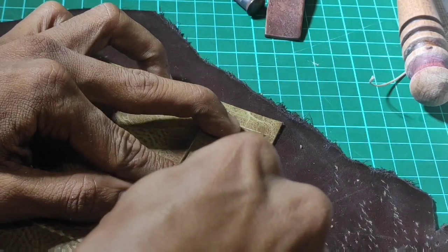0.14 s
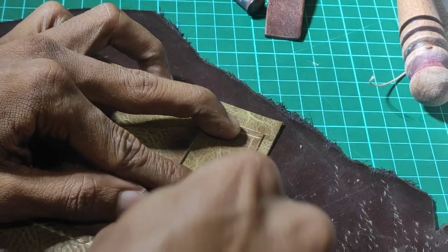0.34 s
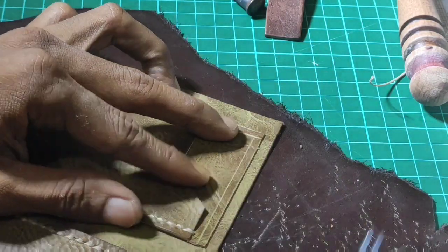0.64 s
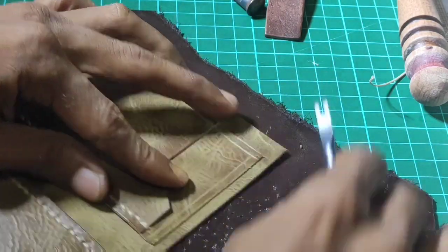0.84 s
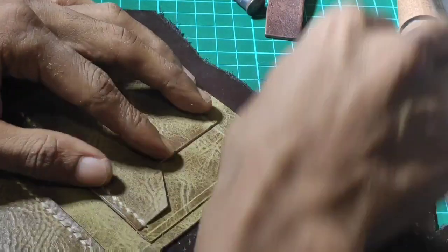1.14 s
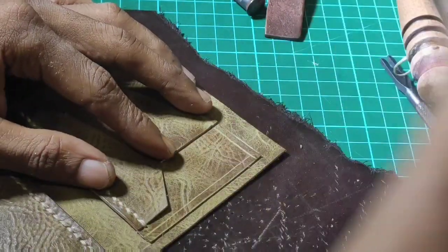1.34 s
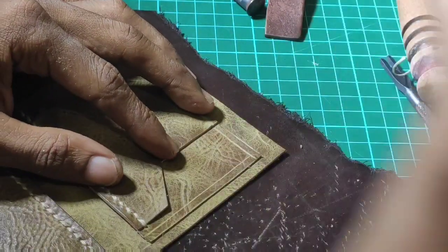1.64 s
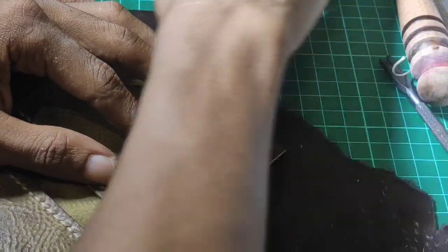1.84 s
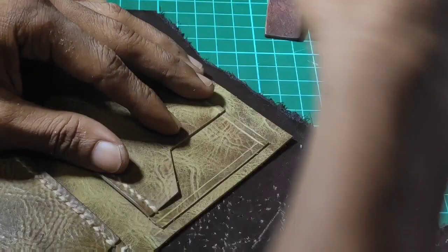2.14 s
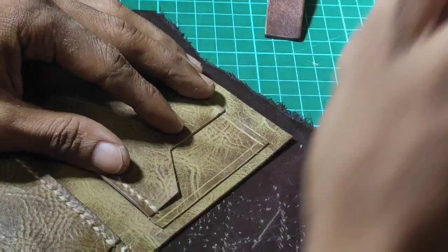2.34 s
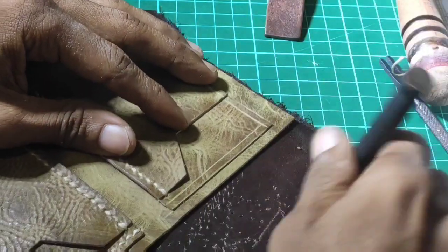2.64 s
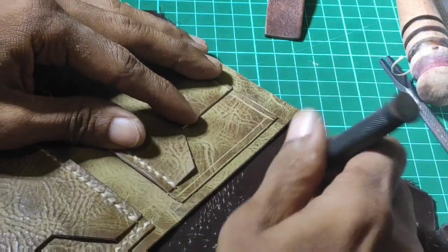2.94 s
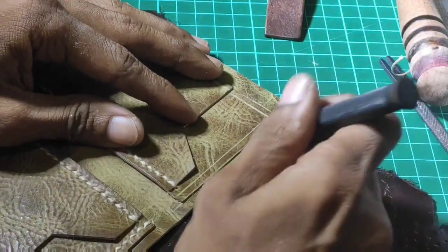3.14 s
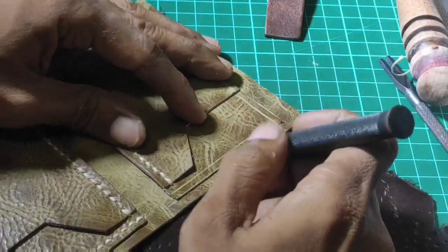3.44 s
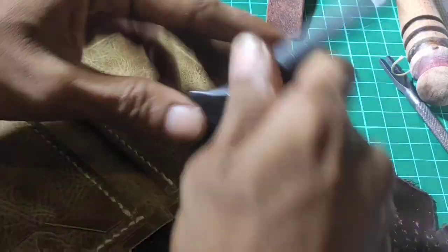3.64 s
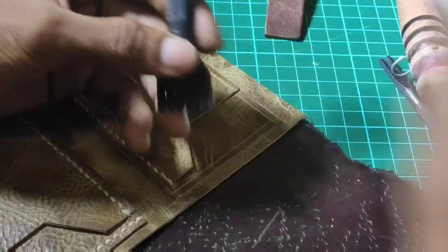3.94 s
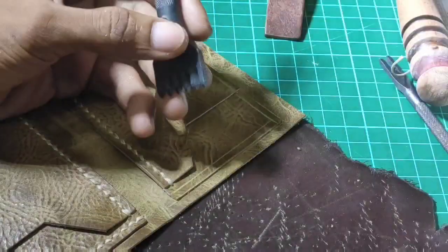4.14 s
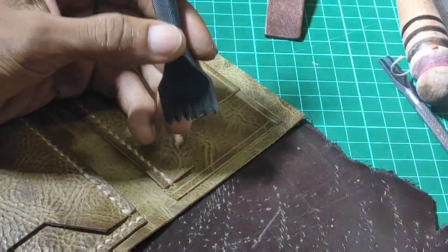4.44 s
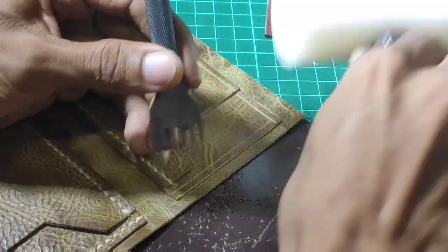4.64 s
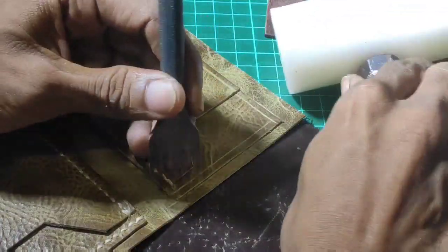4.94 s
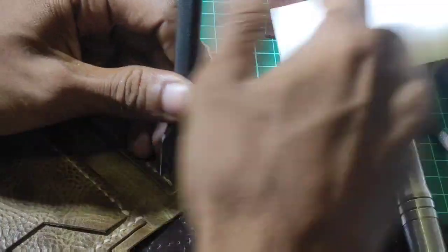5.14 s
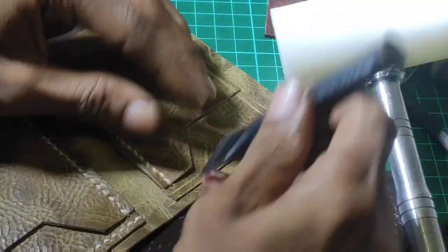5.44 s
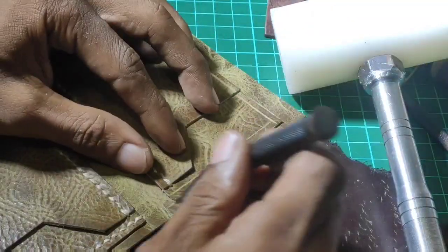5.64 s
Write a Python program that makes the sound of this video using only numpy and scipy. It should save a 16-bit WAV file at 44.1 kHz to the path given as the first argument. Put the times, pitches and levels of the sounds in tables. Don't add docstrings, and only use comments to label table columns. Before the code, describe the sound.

Steel leather tools clack onto a cutting mat on a wooden table, a short gritty drag follows, then a nylon mallet thuds down and settles.

```python
import sys
import numpy as np
from scipy import signal
from scipy.fft import rfft, irfft
from scipy.io import wavfile
from scipy.ndimage import uniform_filter1d

SR = 44100
rng = np.random.default_rng(int(sys.argv[2]) if len(sys.argv) > 2 else 0)


def master_out(mix):
    frames = np.transpose(np.atleast_2d(mix))
    ceiling = np.clip(frames, -1, 1)
    pcm = np.round(ceiling * 32767).astype(np.int16)
    wavfile.write(sys.argv[1], SR, pcm)


def decibels_to_gain(level_db):
    exponent = np.asarray(level_db, float) / 20
    return 10 ** exponent


N = 255294
TIME = np.arange(N) / SR

# f/Hz, correlation [-1 to 1]
ALIKE = [(60, 0.89), (300, 0.79), (640, 0.35), (1400, -0.38), (3000, -0.057), (15000, -0.14)]


def unit(x):
    return x / np.sqrt(np.mean(x ** 2))


def read(table, hz):
    f, v = np.transpose(table)
    return np.interp(np.log(np.maximum(hz, 1)), np.log(f), v)


def noise(colour, size=N, alike=None):
    hz = np.fft.rfftfreq(size, 1 / SR)
    share = np.clip(read(alike, hz), -.99, .99) if alike else 0 * hz
    spectra = rfft(rng.standard_normal((2, size))) * decibels_to_gain(read(colour, hz))
    mid, side = spectra * np.sqrt([1 + share, 1 - share])
    return unit(irfft([mid + side, mid - side], size))


def hump(hz, octaves):
    near, far = 2 ** (octaves / 2), 2 ** (2 * octaves)
    return [(hz / far, -40), (hz / near, -3), (hz, 0), (hz * near, -3), (hz * far, -40)]


def walk(rate):
    k = int(SR / rate)
    return uniform_filter1d(np.repeat(rng.standard_normal(N // k + 1), k), k)[:N]


def swell(s, db, rise_s, fall_s):
    return decibels_to_gain(db - 20 * np.maximum((s - TIME) / rise_s, (TIME - s) / fall_s))


def fade(t, t60):
    return 1000. ** (-t / t60)


def ring(modes, scatter_db=0., size=SR // 2):
    hz, db, t60 = np.transpose(modes)[:, :, None]
    t = np.arange(size) / SR
    gain = decibels_to_gain(db + scatter_db * rng.standard_normal(db.shape))
    return np.sum(gain * np.sin(2 * np.pi * hz * t) * fade(t, t60), axis=0)


def add(out, s, x, pan_db=0.):
    i = int(s * SR)
    x = (np.atleast_2d(x) * decibels_to_gain(np.array([[pan_db], [-pan_db]]) / 2))[:, :N - i]
    out[:, i:i + x.shape[1]] += x


def room_tone():
    # f/Hz, level/dB per Hz
    air_colour = [(35, -19), (60, 1.5), (92, -9.5), (208, -15.5), (269, -17.5), (296, -16.5), (357, -26),
                  (383, -22.5), (411, -21.5), (870, -19.5), (1490, -27), (2680, -30), (7890, -43.5),
                  (14900, -43.5), (16300, -43)]
    level_db = -62.5 + .7 * walk(2.5)
    return decibels_to_gain(level_db) * noise(air_colour, alike=ALIKE)


def fan_hum():
    # f/Hz, rms level/dB
    fan_lines = [(293, -88), (384, -82), (757, -86.5)]
    return sum(decibels_to_gain(db + 2.5 + 5.3 * walk(6.1)) * np.sin(2 * np.pi * hz * TIME) for hz, db in fan_lines)


def table_sway():
    # t/s, level/dB
    leans = [(.03, -69), (.29, -66), (.6, -67), (1.21, -62), (1.55, -60), (1.71, -66), (2.01, -58),
             (2.37, -50), (2.51, -57), (2.63, -56), (3.03, -58), (3.3, -65), (3.45, -66), (3.77, -65),
             (4.05, -62), (4.32, -59), (4.43, -58), (4.66, -63), (4.92, -48), (5.06, -53), (5.26, -63),
             (5.53, -65), (5.68, -64)]
    rest_db, lean_in_s, settle_s = -71, .16, .18
    rumble = noise([(10, -24), (25, 12), (40, 26.0), (62, 9.5), (90, -45)], alike=[(20, 1.0), (100, 0.92)])
    strongest = np.max([swell(s, db, lean_in_s, settle_s) for s, db in leans], axis=0)
    return strongest.clip(decibels_to_gain(rest_db)) * rumble


def room(x):
    # f/Hz, level/dB, t60/s (time to fade by 60 dB)
    echo_bands = [(132, -31.5, 0.42), (256, -24, 0.33), (605, -23, 0.36), (1500, -23, 0.44),
                  (4000, -14, 0.45), (9400, -8.5, 0.2)]
    t = np.arange(SR // 2) / SR
    tail = 0
    for hz, db, t60 in echo_bands:
        tail = tail + decibels_to_gain(db) * noise(hump(hz, 1.0), len(t), ALIKE) * fade(t, t60)
    first_echo = np.clip((t - .002) / 0.0015, 0, 1)
    tail = tail * first_echo * np.cos(np.pi * t) ** 2 * decibels_to_gain(-27.5)
    return signal.fftconvolve(x.mean(axis=0)[None], tail)[:, :N]


def table_shakes():
    # t/s, peak/dB, f/Hz, t60/s
    presses = [(1.1935, -39, 111, 0.098), (.742, -47, 127, 0.15), (4.9, -45, 58, 0.2), (4.31, -46, 95, .12),
               (2.982, -46, 118, 0.2), (2.319, -45.5, 47.5, 0.51), (2.2, -47, 44, 0.28),
               (4.945, -32.5, 83, 0.15)]
    rocks = [(2.0028, -30, 96, .07), (2.022, -34, 110, .06), (2.0375, -27, 112, .055),
             (2.045, -36, 175, .06), (2.071, -35, 105, .06)]
    rolls = [(4.910, -19, 105, .045), (4.983, -33, 92, .2), (5.013, -39, 80, .12), (5.034, -36, 185, .07),
             (5.046, -35, 110, .07)]
    out = np.zeros((2, N))
    soft_push = np.hanning(120) / 60
    for s, db, hz, t60 in presses + rocks + rolls:
        add(out, s, signal.fftconvolve(ring([(hz, db, t60)]), soft_push))
    return out


def drag():
    # fastest moment t/s, hiss/dB, rub minus hiss/dB, rise time per 20 dB/s, fall time per 20 dB/s (0 =
    strokes = [(0.899, -74.5, -3.5, 0.062, 0.9), (2.646, -72, 3, 0.015, 0.35),
               (3.855, -79.5, 13, 0.012, 0.22), (4.316, -64.5, -0.5, 0.032, 0.17),
               (4.36, -54, 7.5, 0.06, 0.075), (4.39, -78, 14.5, .05, 0.05), (1.3, -82, 21, 0.21, 0.43),
               (4.438, -53, 5, 0.013, 0.1327), (4.486, -50.5, -5, 0.058, 0.0455),
               (4.55, -72.5, -17, 0.04, 0.2), (4.915, -62, 5.5, .008, 0.25), (5.087, -66, -3, 0.01, 0)]
    # f/Hz, level/dB per Hz
    hiss_colour = [(1470, -35), (2500, -19), (3280, 2), (3800, -9.5), (4370, -1), (4840, -3), (5560, -1),
                   (6550, -3), (11300, -10), (15400, -13), (16000, -7)]
    # f/Hz, level/dB per Hz
    rub_colour = [(120, -41), (200, -19.5), (553, -6), (616, -24), (915, 1), (1030, -13.5), (1300, -6),
                  (3500, -20), (4550, -47), (7700, -120)]
    grains = decibels_to_gain(2.0 * rng.exponential(size=N // 40 + 1)).repeat(40)[:N]
    grit = grains * decibels_to_gain(2.2 * walk(60))
    hiss = unit(noise(hiss_colour, alike=[(3000, 0.14), (15000, 0.14)]) * grit)
    rub = unit(noise(rub_colour, alike=[(300, 0.73), (3000, 0.069)]) * decibels_to_gain(4.66 * walk(90)))
    return sum(swell(s, db, rise_s, fall_s) * (hiss + decibels_to_gain(rub_db) * rub)
               for s, db, rub_db, rise_s, fall_s in strokes)


def edge_ticks():
    # t/s, peak/dB, left minus right/dB, centre f/Hz
    ticks = [(1.1755, -38, -2, 4500), (1.2311, -44.5, 5, 4030), (1.2845, -38.5, 3, 5300),
             (1.3224, -42.5, 2, 3850), (1.397, -42, 1, 4030), (2.0126, -34, 2, 8200), (2.023, -40, 1, 6400),
             (2.0562, -46, 4, 5140), (2.0673, -43, -1.2, 5130), (2.6336, -37, 5, 6250),
             (3.016, -51, -2, 4230), (3.8454, -43, -7, 5550), (4.4251, -20.5, -1, 6260),
             (4.8664, -34.5, 5, 4000), (4.9067, -24, -1.2, 4000)]
    # t/s, peak/dB, left minus right/dB
    prongs = [(1.2311, -52, -.4), (1.2845, -56, 4), (3.7823, -56, 3), (4.4241, -23.5, 5), (4.429, -28, 2.2),
              (4.4546, -32, 0), (4.4806, -31, 0), (4.887, -44, 4), (4.918, -35.5, 5), (5.0397, -38.5, 7),
              (5.051, -41, 5), (5.0782, -41, 5)]
    # t/s, peak/dB, left minus right/dB, centre f/Hz, t60/s
    scuffs = [(1.4134, -48, -4, 2590, 0.033), (2.6276, -42, 1, 1740, 0.083), (3.0088, -47, -3, 1850, 0.028),
              (3.8302, -49, -8, 3050, 0.026), (2.6284, -45.5, -10, 7400, 0.049)]
    tick_t60_s, prong_hz, prong_t60_s = 0.017, 9800, 0.015
    out, t = np.zeros((2, N)), np.arange(4096) / SR
    edges = [row + (tick_t60_s,) for row in ticks]
    edges += [row + (prong_hz, prong_t60_s) for row in prongs]
    for s, db, pan_db, hz, t60 in edges + scuffs:
        burst = noise(hump(hz, 1.16), len(t), [(1000, 0.24), (15000, 0.11)])
        burst = burst * np.minimum(t / 0.00015, 1) * fade(t, t60)
        add(out, s + 0.00056, decibels_to_gain(db - 11) * burst, np.clip(pan_db, -5, 5))
    return out


def tool_rings():
    # (t/s, level/dB)
    creaser = ([(8410, -4, 0.45), (8830, 1, 0.11), (11200, -11, 0.09), (11000, -10, 0.13), (14930, -7, .1),
                (4380, 4, 0.025)], [(1.177, -57.5), (1.232, -75), (1.285, -75)])
    punch = ([(8500, 4, 0.12), (8200, 4, 0.065), (8200, -1, .08), (9800, -25, 0.061), (12000, -18, .05)],
              [(2.0135, -69), (2.023, -59), (2.057, -65), (2.068, -58), (2.097, -57)])
    punch_shank = ([(5156, -1, 0.1), (5000, -4, 0.07), (4630, -4, 0.065)], [(2.058, -54), (2.075, -61)])
    iron = ([(5806, 0, 0.03), (5770, -26, 0.11), (5780, -19, 0.036), (6870, -28, .05)], [(2.636, -48),
             (2.665, -62), (3.017, -67), (4.4262, -31), (4.431, -44), (5.063, -48), (5.09, -55)])
    mallet = ([(2027, -0.5, 0.089), (4000, -14.5, 0.049), (3880, -7, 0.015)], [(4.867, -37.5),
               (4.9077, -43.5)])
    handle = ([(860, 1, 0.019), (530, -39, .1)], [(3.8405, -48)])
    grip = ([(518, -2, 0.069), (606, -8.5, 0.071)], [(3.849, -50)])
    tones = np.zeros((2, N))
    for modes, blows in (creaser, punch, punch_shank, iron, mallet, handle, grip):
        for s, db in blows:
            tone = decibels_to_gain(db) * ring(modes, 0.71)
            later = np.pad(tone, (3, 0))[:-3]
            add(tones, s, [tone, later])
    return tones * decibels_to_gain(2.2 * walk(250))


def land(out, rows, board, pan_db, thump_db, rebound_hz):
    # f/Hz, level/dB, t60/s
    frame_modes = [(102, 0, .075), (84, -18, .3), (128, -20, .2)]
    for s, db, ms, board_db in rows:
        t = np.arange(int(ms * SR / 400)) / SR / (ms / 1000)
        push = np.exp(-((t - .8) / 0.37) ** 2) * (1 + np.tanh(1.9 * (t - .8)))
        rebound = signal.butter(1, rebound_hz / ms, "high", fs=SR, output="sos")
        click = signal.sosfilt(rebound, np.pad(-push, (0, SR // 50)))
        board_ring = signal.fftconvolve(ring(board, 2.5), push / push.sum())
        frame_ring = signal.fftconvolve(ring(frame_modes, 0.89), np.hanning(130) / 65)
        start = s - np.argmin(click) / SR
        add(out, start, decibels_to_gain(db) * click / np.abs(click).max(), pan_db)
        add(out, start + ms * 0.00077, decibels_to_gain(db + board_db - 17.0) * board_ring, pan_db / 2)
        add(out, s + .0017, decibels_to_gain(db + thump_db) * frame_ring)


def soft_contacts():
    # f/Hz, level/dB, t60/s
    damped_board = [(213, -19, 0.073), (273, -4, 0.12), (460, -17, 0.078), (480, -9, 0.039),
                    (563, -0.5, 0.079), (712, 4.5, 0.062), (840, 6, 0.086)]
    # t/s, peak/dB, contact/ms, board ring/dB
    bumps = [(.7381, -46, 1.3, -3.5), (2.6276, -24, 1.53, 1.5), (3.0119, -29, 1.83, -4)]
    nudges = [(2.6492, -42, 0.89, -8), (3.297, -54, 0.9, -2)]
    out = np.zeros((2, N))
    land(out, bumps, damped_board, pan_db=-2.5, thump_db=0.45, rebound_hz=270)
    land(out, nudges, damped_board, pan_db=.4, thump_db=-14, rebound_hz=240)
    return out


def tools_landing():
    # f/Hz, level/dB, t60/s
    bare_board = [(206, -10, 0.13), (281.4, -9.5, 0.16), (440, -14, 0.16), (485, -8, 0.12),
                  (581, -7.5, 0.064), (680, -39, 0.1), (897, -4, 0.072), (944.5, -4, 0.1),
                  (1080, -3.5, 0.072), (1166, -10, 0.074), (1400, -30, 0.073), (1653, -3, 0.063),
                  (1850, -31, 0.078), (2200, -3.5, 0.08), (2400, -26, 0.075), (3280, -12, .02),
                  (4040, -13, 0.022)]
    # t/s, peak/dB, contact/ms, board ring/dB
    creaser_lands = [(1.1769, -22, 0.55, -26), (1.1788, -28.5, 0.78, 3.5), (1.18, -30, .56, -22),
                     (1.1872, -41, 0.31, -17), (1.2008, -37, 0.5, -17), (1.2325, -28, 0.44, -2),
                     (1.2575, -47, 0.46, -8), (1.2638, -39, 0.95, -12), (1.2855, -23.5, .51, -22),
                     (1.3253, -31.5, 0.5, 2.5), (1.3336, -33.5, .57, -4), (1.3967, -34, 0.48, 3),
                     (1.4024, -44, 0.55, -13), (1.4142, -38.5, 0.89, 6)]
    punch_lands = [(2.0131, -21, 0.51, -7.5), (2.0351, -30, 0.41, 2.5), (2.057, -26.5, 0.59, -5.5),
                   (2.0604, -29.5, 0.5, -15), (2.0685, -38, 0.41, 1), (2.0975, -33.5, 0.55, -7),
                   (2.0988, -42, .69, -3.5)]
    iron_lands = [(.7368, -50, .25, -28), (3.0181, -37.5, 0.57, 1), (4.4285, -33, 0.45, 4.5),
                  (4.4505, -46, 1, 0)]
    mallet_bounces = [(4.8947, -45, 0.55, -11), (4.9093, -30, 0.54, -20), (4.9151, -24.5, 0.46, -2.5),
                      (4.9508, -50, .68, -2), (4.9813, -32, 0.51, -5), (5.0011, -35, 0.64, 2),
                      (5.0382, -38, 0.4, 5.5)]
    heavy_lands = [
        (4.4252, -24.5, 0.46, -7),
        (4.8666, -19, 0.55, -5.5),
        (4.9075, -15, .45, -7),
    ]
    out = np.zeros((2, N))
    land(out, creaser_lands, bare_board, pan_db=.4, thump_db=-22, rebound_hz=310)
    land(out, punch_lands, bare_board, pan_db=1.5, thump_db=-18, rebound_hz=240)
    land(out, iron_lands, bare_board, pan_db=-2.5, thump_db=-30, rebound_hz=280)
    land(out, mallet_bounces, bare_board, pan_db=2.6, thump_db=-29, rebound_hz=330)
    land(out, heavy_lands, bare_board, pan_db=2.2, thump_db=-11, rebound_hz=110)
    return out


def scene():
    background = room_tone() + fan_hum() + table_sway()
    near = table_shakes() + drag() + edge_ticks() + tool_rings() + soft_contacts() + tools_landing()
    return near + room(near) + background


def roll_off(x):
    return signal.sosfilt(signal.butter(12, 16480, fs=SR, output="sos"), x)


def record(dry):
    low_cut = signal.butter(2, 45, "high", fs=SR, output="sos")
    top_cut = signal.butter(12, 15350, fs=SR, output="sos")
    heard = signal.sosfilt(np.vstack([low_cut, top_cut]), dry)
    return roll_off(heard)


dry = scene()
out = record(dry)
master_out(out)
```